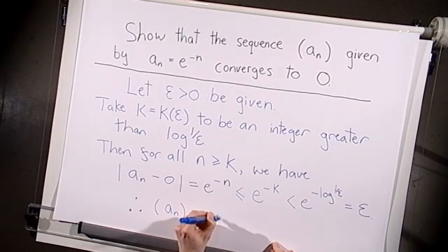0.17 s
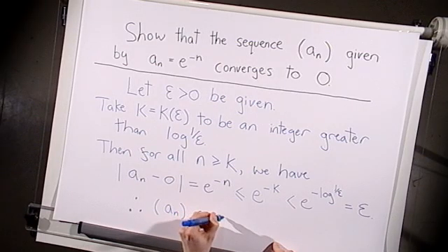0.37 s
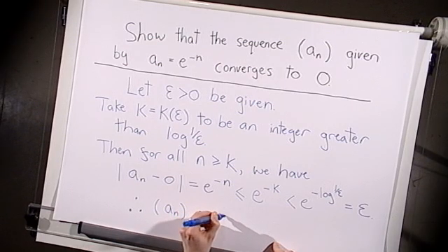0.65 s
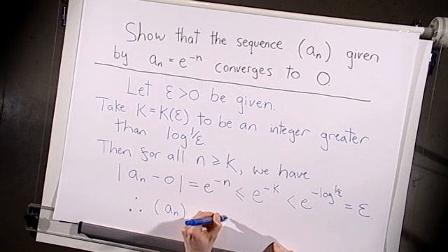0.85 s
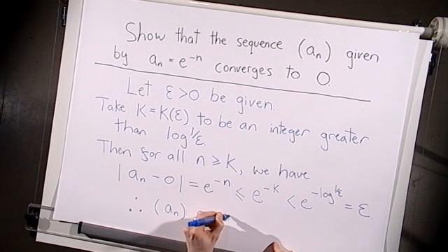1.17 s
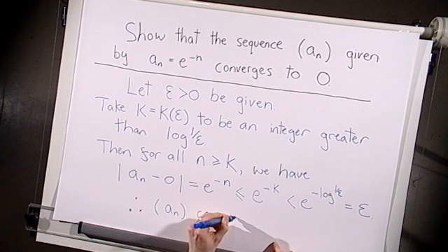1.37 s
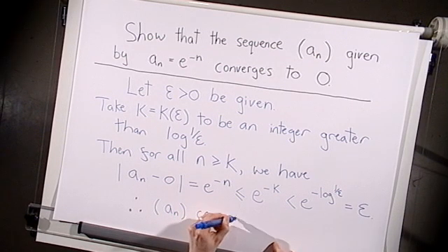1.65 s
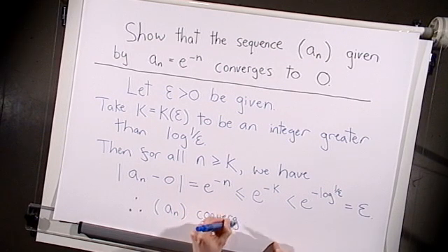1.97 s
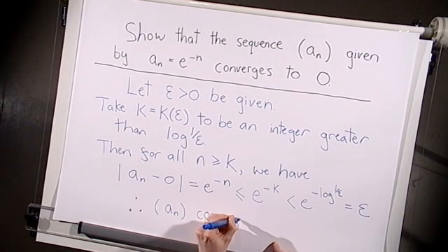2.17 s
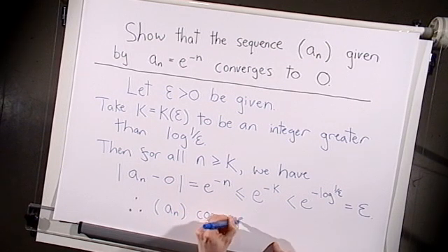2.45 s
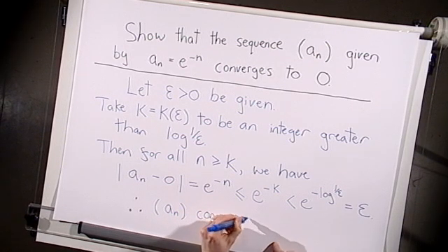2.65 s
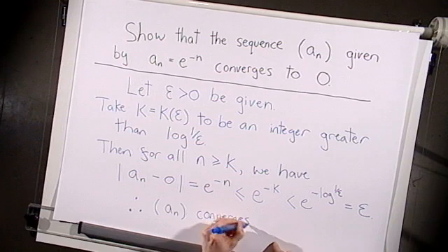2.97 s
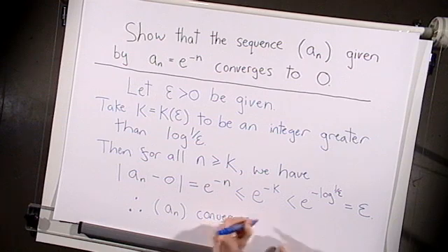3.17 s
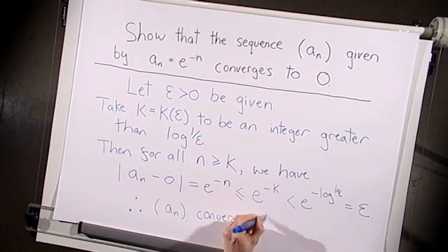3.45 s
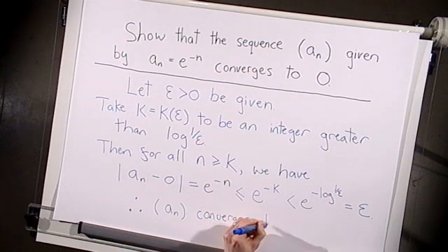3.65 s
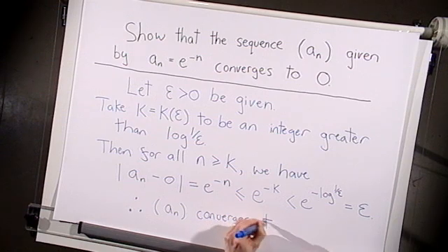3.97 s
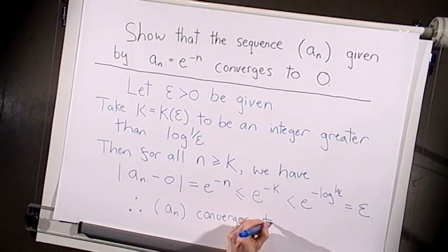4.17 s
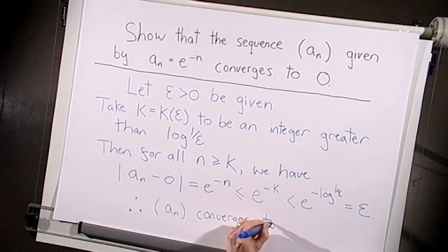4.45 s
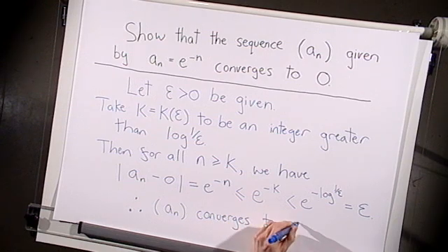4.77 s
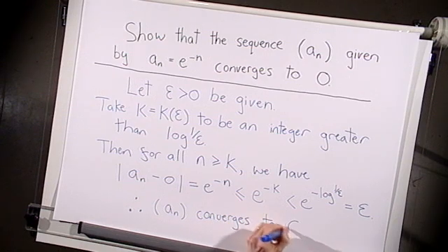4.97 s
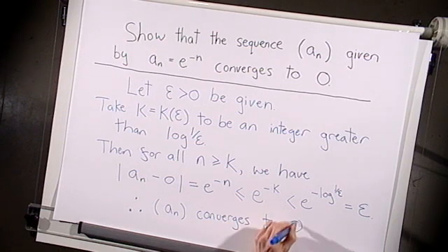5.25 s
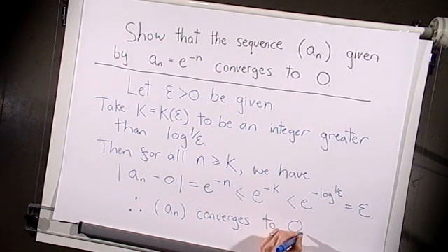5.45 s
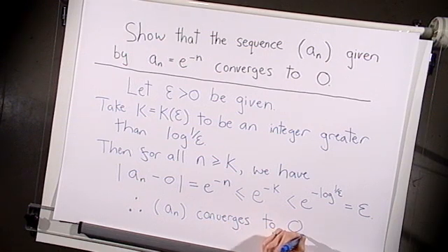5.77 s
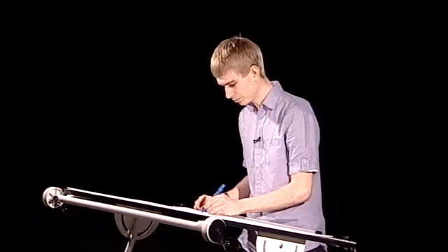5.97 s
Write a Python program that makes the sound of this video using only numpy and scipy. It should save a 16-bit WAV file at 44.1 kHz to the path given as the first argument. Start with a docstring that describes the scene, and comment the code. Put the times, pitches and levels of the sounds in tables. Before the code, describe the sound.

In a quiet, lightly reverberant room with a deep steady air rumble, a close microphone hears a marker writing letter by letter: bright fizzy strokes, swelling and stopping, separated by short gaps. Small pen clicks punctuate them. After about three seconds dull board thumps join in, with short palm slides on paper and one faint sinking groan. The final strokes are longer, then a soft low cloth brush.

```python
"""A felt marker writes a few words on a paper sheet on a tilted board, over a quiet room's ventilation rumble.
From the start, sweep after sweep, fibre catches excite the nib near 7.5 kHz, the barrel and the sheet.
Light ticks soon fall among the letters, as decaying sines; near 2.1 s a faint filtered hiss dies away.
From 2.9 s low knocks on the board, hard and light, ring its modes; from 3.3 s the hand also slides, as
filtered friction; near 3.7 s the board groans once, sinking in pitch. Last, the sleeve brushes the sheet."""
import sys
import numpy as np
from scipy import signal
from scipy.fft import rfft, irfft, next_fast_len
from scipy.io import wavfile

SR = 44100
rng = np.random.default_rng(int(sys.argv[2]) if len(sys.argv) > 2 else 0)


def to_wav(s):
    """Save 16-bit WAV."""
    ch = np.atleast_2d(s).T  # columns
    pcm = np.round(np.clip(ch, -1, 1) * 32767)  # PCM
    wavfile.write(sys.argv[1], SR, pcm.astype(np.int16))


N = 269451
TIME = np.arange(N) / SR  # s


def amp(db):
    """Logarithmic level: decibels to linear amplitude."""
    return 10 ** (np.asarray(db) / 20)


def unit(x):
    """Power normalisation: scales a signal to rms 1."""
    return x / np.sqrt(np.mean(x ** 2) + 1e-20)


def add(mix, s, sound):
    """Superposition: adds a sound into the mix from time s, in seconds."""
    part = mix[max(round(s * SR), 0):][:len(sound)]
    part += sound[:len(part)]


def colour(x, points):
    """Spectral shaping: a gain drawn through (f/Hz, level/dB) points over log frequency, then rms 1."""
    hz, db = np.transpose(points)
    size = next_fast_len(len(x))
    bins_hz = np.fft.rfftfreq(size, 1 / SR)
    gain = amp(np.interp(np.log(bins_hz + 1), np.log(hz + 1), db))
    return unit(irfft(rfft(x, size) * gain, size)[:len(x)])


def resonate(x, hz, width):
    """Resonance by heterodyning: shift the centre to 0 Hz, low-pass by two equal poles, shift back."""
    turn = np.exp(2j * np.pi * np.cumsum(hz * np.ones(len(x))) / SR)
    r = np.exp(-np.pi * width / SR)  # pole radius; width is that of a single stage
    envelope = signal.lfilter([(1 - r) ** 2], [1, -2 * r, r * r], x / turn)
    return 2 * (turn * envelope).real


def wander(rate):
    """Random modulation: chance values drawn rate times a second, joined by lines, of rms 1."""
    return unit(np.interp(TIME * rate, np.arange(N), rng.standard_normal(N)))


def catches(per_s, spread_db, smooth):
    """Friction as shot noise: fibres snap free in clicks of uneven size over a smooth rub."""
    size_db = spread_db * np.minimum(rng.exponential(1, N), 4)
    size = amp(size_db) * rng.choice([-1, 1], N)
    clicks = unit(size * (rng.random(N) < per_s / SR))
    return clicks + smooth * rng.standard_normal(N)


def swell(start, rise, fall, db, sharpness):
    """Friction law: speed ramps up and down linearly, and the gain follows a power of it."""
    speeding_up = (TIME - start) / max(rise, 1 / SR)
    slowing_down = (start + rise + fall - TIME) / max(fall, 1 / SR)
    speed = np.minimum(speeding_up, slowing_down)
    gain, moving = np.zeros(N), speed > 0
    gain[moving] = amp(db) * speed[moving] ** abs(sharpness)
    return gain


def blend(gains, settings):
    """Power addition: joint gain of overlapping movements, then each setting's power-weighted mean."""
    power = np.square(gains)
    total = power.sum(0)
    weighted = np.transpose(settings) @ power + 1e-20 * np.mean(settings, 0)[:, None]
    return np.sqrt(total), *weighted / (total + 1e-20)


# spectrum of the air noise: (f/Hz, relative level/dB)
AIR_SPECTRUM = [(26, -32), (45, -4), (98, -16), (149, -20.5), (275, -24.5), (310, -22), (416, -27.5),
                (545, -23.5), (748, -31), (910, -29), (1380, -33), (1890, -33), (2540, -34), (2800, -35.5),
                (15500, -40.5)]
# ventilation drones: (f/Hz, single-stage width/Hz, rms level/dB)
DUCT_RESONANCES = [(25.7, 7.3, -56), (37.6, 21, -65.5), (147.3, 20, -82.5), (309.2, 13.4, -78),
                   (378, 100, -77), (548, 21, -79)]


def ventilation(air_db=-65):
    """Broadband flow noise: steady shaped noise with narrow duct resonances, the deepest a rumble."""
    out = amp(air_db) * colour(rng.standard_normal(N), AIR_SPECTRUM)
    for hz, width, db in DUCT_RESONANCES:
        settled = resonate(rng.standard_normal(N + SR), hz, width)[SR:]  # drop the onset
        out += amp(db) * unit(settled)
    return out


def room(x, bass_t60=0.46, treble_t60=0.12):
    """Diffuse reverberation: convolution with decaying noise whose treble dies first (t60 in s)."""
    t = np.arange(SR // 2) / SR
    noise = rng.standard_normal(len(t))
    bass = signal.sosfilt(signal.butter(2, 900, fs=SR, output="sos"), noise)
    tail = 2 * bass * amp(-60 * t / bass_t60) + noise * amp(-60 * t / treble_t60)
    tail *= t > .008  # the tail starts after 8 ms
    return signal.fftconvolve(x, tail / np.linalg.norm(tail))[:N]


# the board's one groan under the dragging hand: (start t/s, rise/s, fall/s, level/dB)
BOARD_GROAN = (3.672, .022, .055, -57.5)


def groan(start_hz=232, sag_hz_per_s=680, sharpness=2.0, width_hz=29.4):
    """Frequency modulation: a low judder with its octave sinks in pitch as the hand slows down."""
    start, rise, fall, _ = BOARD_GROAN
    hz = start_hz - sag_hz_per_s * np.clip(TIME - start, 0, rise + fall)
    turn = 2 * np.pi * np.cumsum(hz + width_hz / 2 * wander(rate=65.0)) / SR
    judder = unit(np.sin(turn) + amp(-6.0) * np.sin(2 * turn))
    return swell(*BOARD_GROAN, sharpness) * judder


# low knocks on the board, hard and light: (t/s, level added to the modes/dB)
BOARD_KNOCKS = [(2.910, -35.5), (3.753, -53), (3.9761, -38.5), (4.3326, -45), (5.0106, -43.5), (5.837, -55)]
# modes of the board: (nominal f/Hz, relative level/dB, t60/s)
BOARD_MODES = [(70.6, -11, 0.1), (156, -10.5, 0.1), (230, -1, 0.031), (299, -17, 0.35), (334, 15.5, 0.013),
               (421, -10, 0.072), (544, -14, 0.13), (704, -14, 0.02)]


def knocks():
    """Modal superposition: each knock, hard or light, rings the board in its low modes."""
    t, out = np.arange(SR // 2) / SR, np.zeros(N)
    onset = 1 - np.exp(-t / 0.0027)
    for s, db in BOARD_KNOCKS:
        detune = 1 + 0.016 * rng.standard_normal(len(BOARD_MODES))
        ring = np.zeros(len(t))
        for (hz, level, t60), d in zip(BOARD_MODES, detune):
            ring += amp(level - 60 * t / t60) * np.sin(2 * np.pi * hz * d * t)
        add(out, s, -amp(db) * ring * onset)
    return out


# light clicks of the pen: (t/s, level/dB, f/Hz)
PEN_TICKS = [(0.2043, -50, 1690), (.474, -55.5, 1830), (.632, -54.5, 4080), (.7014, -58, 1820),
             (1.227, -54, 1670), (1.901, -42.5, 2100), (2.377, -53.5, 1590), (2.389, -53.5, 1950),
             (2.8, -57, 1900), (2.9068, -53.5, 3580), (2.909, -46.5, 1480), (3.335, -51.5, 2100),
             (3.5525, -40.5, 1640), (3.862, -55.5, 1810), (3.974, -59, 3830), (4.164, -55, 1410),
             (4.165, -48, 4130), (4.6923, -58.5, 1600), (5.0078, -52, 4040), (5.836, -56, 1380)]


def ticks(ring_t60=0.014, rattle_db=-12.0, rattle_t60=0.043):
    """Impact and free decay: a short plastic ring with a longer, faint rattle of the sheet (t60 in s)."""
    t, out = np.arange(SR // 8) / SR, np.zeros(N)
    for s, db, hz in PEN_TICKS:
        ring = np.sin(2 * np.pi * hz * t) * amp(-60 * t / ring_t60)
        noise = unit(resonate(rng.standard_normal(len(t)), hz, width=2450.0))
        rattle = noise * amp(rattle_db - 60 * t / rattle_t60)
        add(out, s, amp(db) * (ring + rattle))
    return out


def drag():
    """Irregular sliding friction: a soft, uneven drag over paper."""
    return catches(per_s=6000, spread_db=2., smooth=1.) * amp(1.5 * wander(rate=70.))


# first row a faint hiss dying away after a stroke, the others slides of the hand:
# (start t/s, rise/s, fall/s, level/dB, centre f/Hz, power share of narrow squeak 0-1)
HISS_AND_SLIDES = [(2.11, 0.014, 0.65, -75, 1590, 0), (3.26, 0.064, 0.035, -62.5, 1130, 0),
                   (3.335, 0.029, 0.037, -63, 2370, 0.04), (3.55, 0.0051, 0.072, -59.5, 1760, 0.3),
                   (3.565, 0.048, 0.071, -63, 1770, 0.25)]
# spectrum of the palm on paper: (f/Hz, relative level/dB)
PALM_SPECTRUM = [(100, -34), (250, 3), (800, -20), (1500, -4), (3400, -8), (5000, -10), (15000, -9)]
# the arm draws back: (t/s, rms level before the drag's unevenness/dB)
ARM_LEVELS = [(5.65, -94), (5.84, -70), (5.96, -63), (6.03, -64.5), (6.11, -59.5)]
# spectrum of the sleeve on paper: (f/Hz, relative level/dB)
SLEEVE_SPECTRUM = [(50, -8), (90, 10.5), (200, 0), (400, 1), (700, -3), (1100, -12.5), (1400, -13),
                   (1650, -10), (2000, -30), (9000, -35)]


def hand(sharpness=0.85):
    """Filtered friction: a faint hiss, then the hand's rubs, some with a soft squeak, and a lower sleeve."""
    gains = [swell(*row[:4], sharpness) for row in HISS_AND_SLIDES]
    gain, hz, squeak = blend(gains, [row[4:] for row in HISS_AND_SLIDES])
    squeak = np.clip(squeak, 0, 1)
    edge = unit(resonate(drag(), hz, width=2100.0))
    rub = unit(edge + amp(-11.0) * colour(drag(), PALM_SPECTRUM))
    narrow = unit(resonate(drag(), hz, width=250.0))
    skin = np.sqrt(1 - squeak) * rub + np.sqrt(squeak) * narrow
    arm_db = np.interp(TIME, *np.transpose(ARM_LEVELS), left=-120)
    return gain * skin + amp(arm_db) * colour(drag(), SLEEVE_SPECTRUM)


# short echo that colours the strokes differently over time: (t/s, signed share)
SHORT_ECHO = [(0, -0.54), (.35, -0.32), (1.4, 0.21), (1.96, 0.15), (2.6, 0.38), (3.7, -0.11), (4.06, 0.82),
              (4.45, -0.02)]


def reflections(x, share, drift, count=6):
    """Comb filtering: a short echo of changing share, then later echoes whose delays drift."""
    index = np.arange(N)
    short = np.interp(index - .00057 * SR, index, x)  # 0.57 ms late
    out = x + np.interp(TIME, *np.transpose(SHORT_ECHO)) * short
    for delay in np.geomspace(.0009, .008, count):  # s
        path = delay + drift * wander(rate=5.)
        out += share * rng.choice([-1, 1]) * np.interp(index - path * SR, index, x)
    return out


# nib sweeps, one for each line or arc of a letter; they overlap where the pen turns without lifting:
# (start t/s, speeding up/s, slowing down/s, relative level/dB, sharpness of the peak,
# relative barrel and sheet rasp/dB, relative fizz against ring/dB, mean nib f/Hz)
NIB_SWEEPS = [(0.0, 0.001, 0.078, -42.5, 3.7, -3.5, -5.5, 7320),
              (0.219, 0.13, 0.045, -48, 1.6, -3.5, -2, 7350),
              (0.348, 0.051, 0.11, -47, 2.23, -4.5, 0, 7680),
              (0.734, 0.034, 0.052, -56, 0.56, -3, -1, 7360),
              (0.815, 0.002, 0.12, -61.5, 0.35, -2, 4.5, 7600),
              (0.866, 0.11, 0.073, -43.5, 1.73, -2.5, -2, 7490),
              (1.003, 0.031, 0.007, -56, 1.0, -2.5, -1.5, 7430),
              (1.227, 0.003, 0.019, -65, 0.8, -3.5, 4, 7540), (1.305, 0.011, 0.12, -43, 3.36, -2, 0, 7830),
              (1.347, 0.083, 0.049, -51.5, 1.37, -3, -2.0, 7500),
              (1.629, 0.049, 0.032, -59.5, 0.5, -0.5, 0.5, 7490),
              (1.706, 0.03, 0.068, -51.5, 0.86, -2, 0.5, 7560),
              (1.773, 0.043, 0.046, -52, 1.53, -4.5, 2, 7800),
              (1.902, 0.062, 0.06, -43, 0.43, -5.5, -4.5, 7670),
              (1.998, 0.074, 0.06, -48.5, 1.35, -1.5, -0.5, 7580),
              (2.464, 0.009, 0.065, -55, 0.62, 0.5, -4, 7200),
              (2.545, 0.031, 0.1, -59, 0.48, -1.5, -1, 7700),
              (2.598, 0.085, 0.095, -44.5, 1.66, -1.0, -3.5, 7530),
              (2.751, 0.0037, 0.016, -57, 0.3, 0, -1, 7640),
              (2.95, 0.026, 0.056, -61, 0.66, 1.5, 1.5, 7570),
              (3.055, 0.067, 0.03, -51, 0.15, -2.5, -4, 7550),
              (3.124, 0.094, 0.051, -58, 1.7, 1.5, -1, 7740),
              (3.647, 0.09, 0.048, -42.5, 0.86, -4, -3, 7590),
              (3.813, 0.015, 0.008, -59, 1.7, -2.5, -1, 7700),
              (4.005, 0.044, 0.074, -52.5, 0.75, -3, -3.0, 7600),
              (4.144, 0.0086, 0.018, -56, 1.0, -3, -2.5, 7370),
              (4.349, 0.017, 0.092, -64.3, 0.9, -3, -2.5, 7500),
              (4.383, 0.12, 0.089, -51, 1.65, -2, -4.5, 7530),
              (4.542, 0.028, 0.053, -52, 1.25, -2.5, -0.5, 7620),
              (4.581, 0.035, 0.045, -53.5, 1.1, -4.5, 0, 7640),
              (5.017, 0.03, 0.21, -57, 0.4, -5, 0.5, 7420), (5.08, 0.12, 0.15, -45.5, 1.9, -3.5, -3, 7410),
              (5.234, 0.084, 0.096, -49, 0.35, -3.5, 5.5, 7450),
              (5.327, 0.043, 0.081, -50.5, 1.28, -5, 0.5, 7700)]
# the nib's upper resonance sings out: (start t/s, rise/s, fall/s, level against the fizz/dB, f/Hz)
NIB_WHISTLES = [(0, .004, .1, -7, 10700), (.24, .1, .2, -9, 10600), (1.89, .07, .07, 0, 10600),
                (2.02, 0.064, .07, -1, 9800), (3.63, 0.051, .12, -4, 10860), (3.99, .06, .1, -2, 10200),
                (4.38, .12, .2, -7, 10800), (5.05, 0.091, .09, 1, 10540), (5.25, 0.074, 0.026, 9, 10450),
                (5.34, 0.036, .1, -1, 13400)]
# resonances of the pen barrel and sheet: (nominal f/Hz, single-stage width/Hz, relative level/dB)
BARREL_RESONANCES = [(1580, 470, -6.5), (2094, 370, -2.5), (2428, 380, 2), (2800, 760, 3.5),
                     (3740, 264, -2.5), (4263, 580, 1.5), (4774, 590, 2), (5680, 420, -3.5)]
# spectra of the sheet and of the nib's fizz: (f/Hz, relative level/dB)
SHEET_SPECTRUM = [(100, -1), (300, -0.5), (600, 0.5), (1000, -5.5), (1500, -0.5), (5000, -0.5),
                  (6500, -6.5), (9000, -36)]
FIZZ_SPECTRUM = [(5500, -63), (7500, -11), (8600, 0), (11400, 0.5), (12400, -3), (13400, -1), (14500, -7),
                 (15700, -8)]


def writing(usual_db=-48.5, whistle_sharpness=0.7):
    """Stick-slip excitation: fibre catches ring the nib, the barrel and the sheet while the pen is down."""
    sweeps = [swell(*row[:5]) for row in NIB_SWEEPS]
    friction, rasp_db, bright_db, nib_hz = blend(sweeps, [row[5:] for row in NIB_SWEEPS])
    speed = friction / amp(usual_db)
    whistles = [swell(*row[:4], whistle_sharpness) for row in NIB_WHISTLES]
    singing, upper_hz = blend(whistles, [row[4:] for row in NIB_WHISTLES])
    # the felt sticks and slips, so the catches come in clumps of a few milliseconds
    clumps = amp(1.4 * wander(rate=450.) + .6 * wander(rate=90.))
    fibres, tip = (clumps * catches(per_s=8000, spread_db=3., smooth=0.78) for _ in range(2))
    drive = reflections(fibres, share=0.24, drift=0.000147)

    nib_hz = nib_hz + 104.0 * wander(rate=35.)  # the nib flexes as it is dragged
    ring = unit(resonate(drive, nib_hz, width=1070.0))

    grip = 1 + .015 * wander(rate=12.)  # the fingers detune the barrel a little as they steer
    barrel = np.zeros(N)
    for k, (hz, width, db) in enumerate(BARREL_RESONANCES):
        barrel += (-1) ** k * amp(db) * resonate(drive, hz * grip, width)
    # the sheet speaks more as the pen travels in from its edge
    sheet = amp(np.interp(TIME, [0, TIME[-1]], [-8., -2.])) * colour(tip, SHEET_SPECTRUM)
    rasp = unit(barrel) + sheet
    rasp = rasp / np.std(rasp)

    # a slow nib makes a duller fizz than a fast one, most of all near the edge of the sheet
    hiss = colour(drive, FIZZ_SPECTRUM)
    lowpass = signal.butter(2, 11500, fs=SR, output="sos")
    dull = colour(signal.sosfiltfilt(lowpass, drive), FIZZ_SPECTRUM)
    keen = speed / (speed + np.interp(TIME, [0, TIME[-1]], [.6, .1]))
    overtone = unit(resonate(tip, upper_hz, width=750.))
    fizz = keen * hiss + (1 - keen) * dull + singing * overtone
    fizz = fizz / np.sqrt(1 + singing ** 2)

    nib = amp(2.0 - bright_db / 2) * ring + amp(1.03 + bright_db / 2) * fizz
    # the low rasp depends less on speed than the nib's treble does
    return amp(usual_db) * (speed * nib + speed ** 0.54 * amp(rasp_db + 0.16) * rasp)


def scene():
    """Linear superposition: pen, board, hand, room and air at one close microphone, in two equal channels."""
    pen = writing()
    handling = knocks() + ticks() + hand() + groan()
    reverberation = room(amp(-16.5) * pen + amp(-18.0) * handling)
    mono = pen + handling + reverberation + ventilation()
    return np.array([mono, mono])


def record(dry, edge_hz=15730):
    """Band limitation: the recorder's steep linear-phase low-pass."""
    lowpass = signal.firwin(767, edge_hz, window=("kaiser", 9), fs=SR)
    return signal.oaconvolve(dry, lowpass[None], "same")


dry = scene()
out = record(dry)
to_wav(out)
```